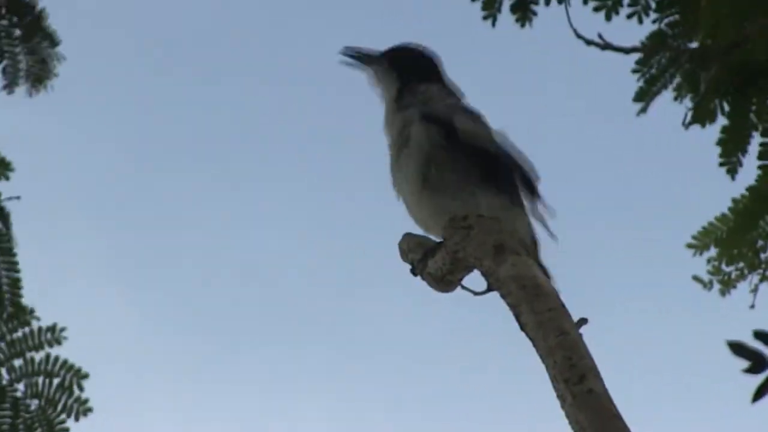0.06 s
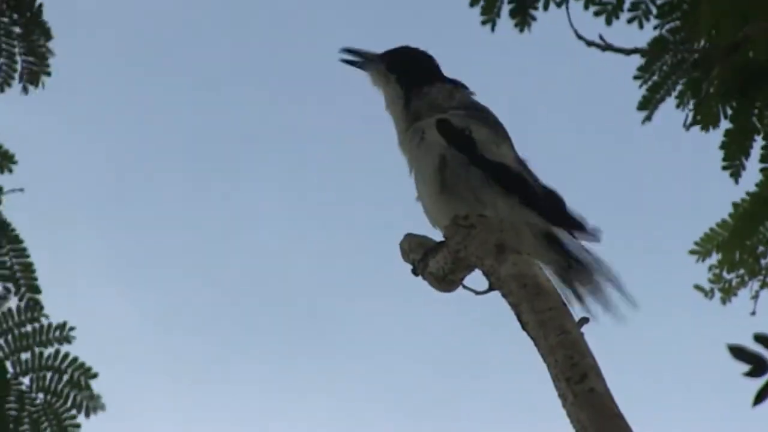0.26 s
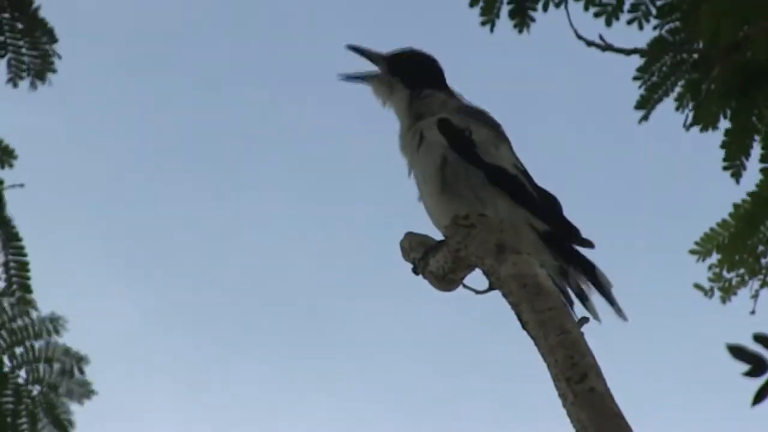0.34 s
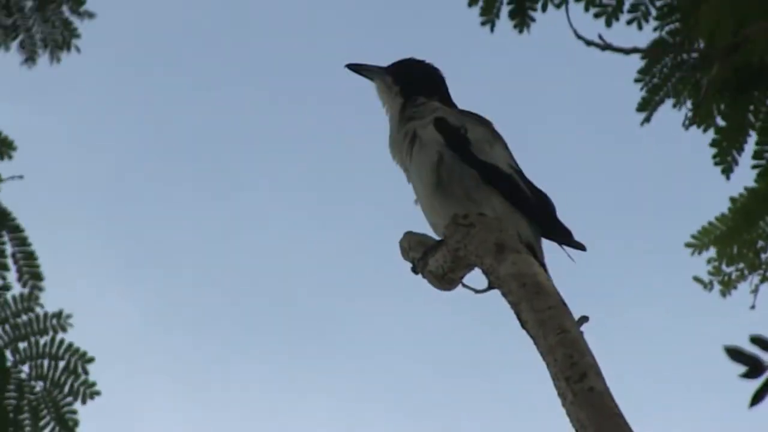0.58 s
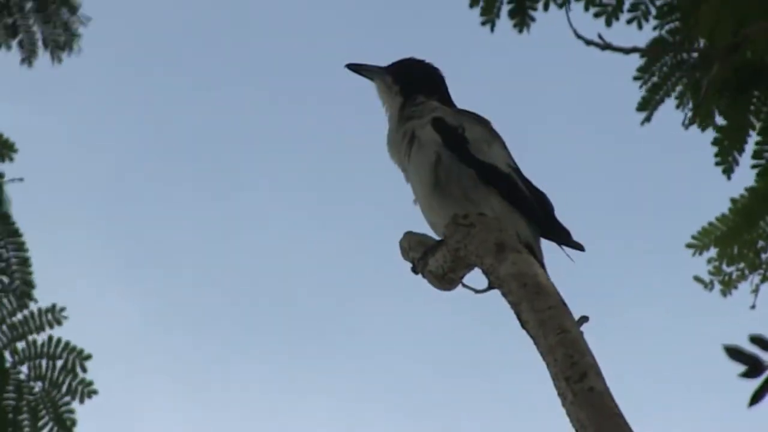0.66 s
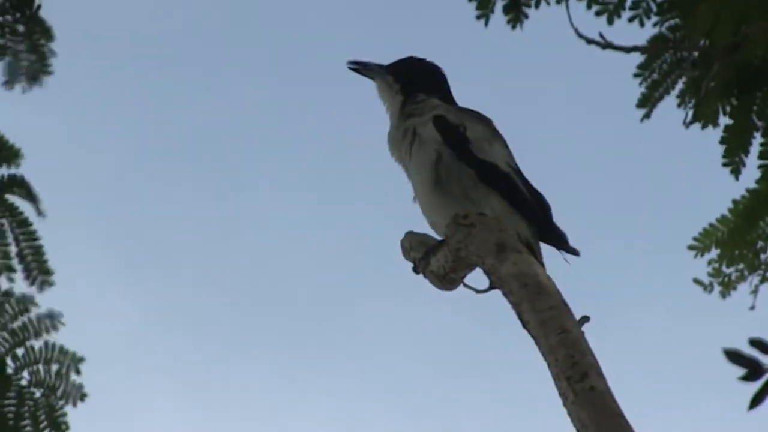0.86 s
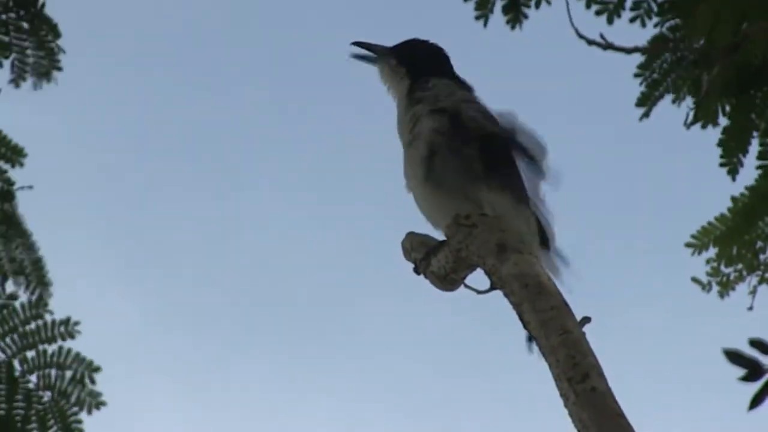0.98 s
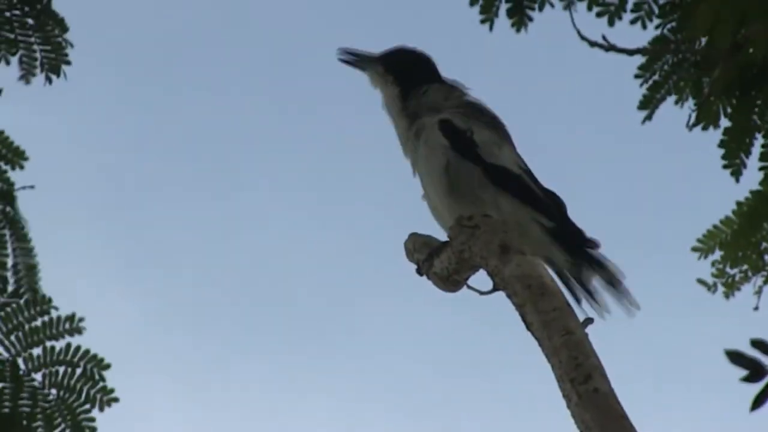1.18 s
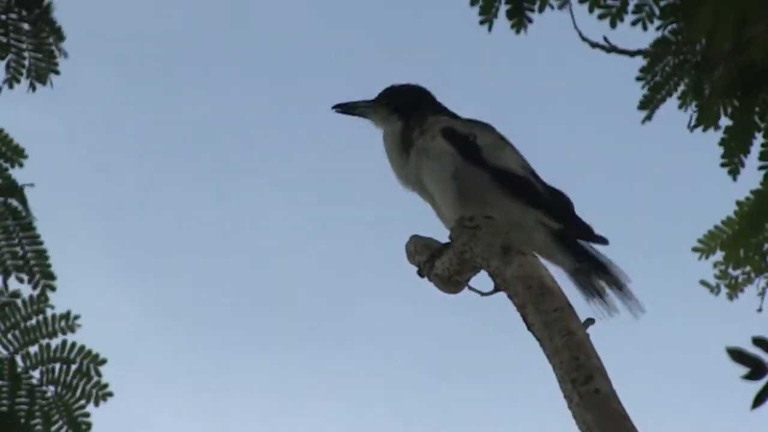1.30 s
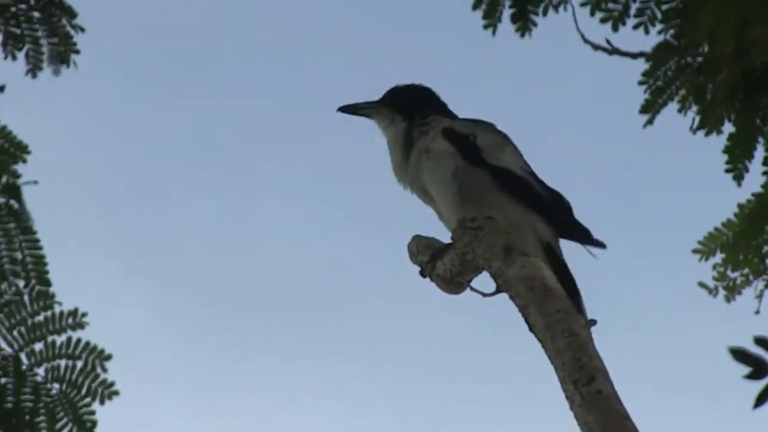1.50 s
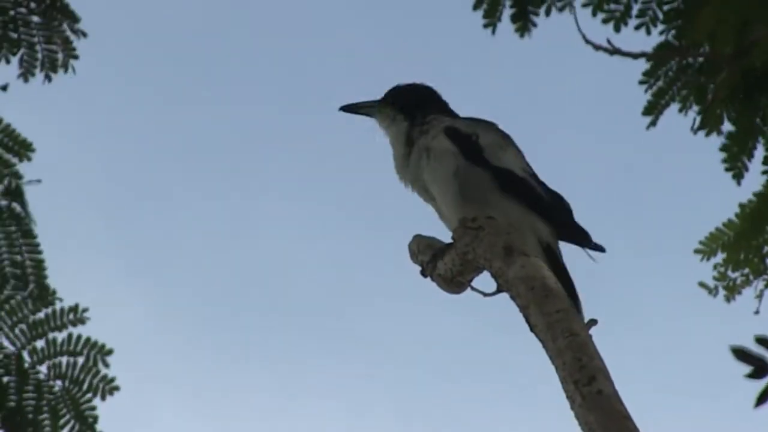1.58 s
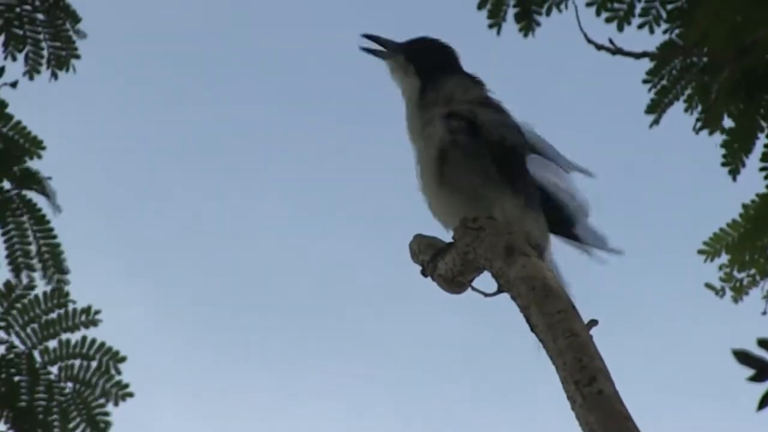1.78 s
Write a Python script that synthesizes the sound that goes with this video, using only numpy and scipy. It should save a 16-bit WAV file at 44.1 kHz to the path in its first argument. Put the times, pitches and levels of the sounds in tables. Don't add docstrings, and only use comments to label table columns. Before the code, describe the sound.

Separate butcherbird calls, tonal then raspy, throbbing, fluty and finally a short cluck, heard from a few metres away in open air with light leafy echo, faint far coos, steady traffic hum and a fading engine.

```python
import sys
import numpy as np
from scipy import signal
from scipy.fft import rfft, irfft
from scipy.io import wavfile
from scipy.ndimage import uniform_filter1d

SR = 44100
rng = np.random.default_rng(int(sys.argv[2]) if len(sys.argv) > 2 else 0)


def linear_from_db(decibels):
    return 10 ** (np.asarray(decibels, float) / 20)


def to_wav(s):
    ch = np.atleast_2d(s).T
    pcm = np.round(np.clip(ch, -1, 1) * 32767)
    wavfile.write(sys.argv[1], SR, pcm.astype(np.int16))


N = 81585
T = np.arange(N) / SR

# time_s, pitch_hz, fundamental_db, overtones_db
CHIP_NOTE = [(.192, 1010, -49, -71), (.198, 1004, -32.5, -54.5), (.203, 1082, -30.5, -61),
             (.211, 1010, -34.5, -68.5), (.218, 1050, -40, -75)]
RISING_NOTE = [(0.271, 795, -37, -72), (.286, 898, -35.5, -72), (.306, 929.5, -25.5, -75),
               (.317, 951, -26, -50), (0.33, 990, -43, -49), (.346, 1010, -24.5, -48),
               (0.36, 1072, -18, -46), (0.369, 1160, -30, -46)]
RISE_CREST = [(.373, 1158, -21, -40), (.376, 1185, -15.5, -48), (.378, 1245, -16.5, -52),
              (.38, 1300, -23, -54), (.382, 1285, -17, -54), (.384, 1250, -15, -56), (.387, 1250, -30, -60),
              (.39, 1260, -24, -62), (.393, 1240, -26, -64), (.397, 1050, -36, -70), (.401, 1000, -55, -75)]
GRACE_NOTE = [(1.112, 1187, -49.5, -58), (1.117, 1214, -28.5, -53), (1.121, 1150, -41.5, -58.5),
              (1.126, 1120, -30, -72), (1.131, 1170, -46.5, -78)]
HELD_NOTE = [(1.132, 1210, -39, -62), (1.142, 1121, -22.5, -43.5), (1.147, 1083, -32.5, -48.5),
             (1.152, 1084, -22, -47.5), (1.173, 1071, -22, -48.5), (1.181, 1088, -29, -43),
             (1.195, 1082, -23, -46.5), (1.215, 1101, -26.5, -48.5), (1.227, 1117, -37, -45)]
FALLING_NOTE = [(1.238, 1154, -20.5, -40), (1.244, 1129, -16.5, -47.5), (1.252, 1135, -30.5, -43.5),
                (1.262, 1009, -19.5, -54.5), (1.269, 1009, -39.5, -54), (1.278, 962, -32, -71),
                (1.285, 950, -37, -74), (1.299, 950, -70, -77.5)]
CLUCK_NOTE = [(1.549, 1056, -37, -72), (1.56, 1063, -31.5, -55.5), (1.568, 954, -41.5, -71),
              (1.57, 1010, -24.5, -64), (1.579, 1035, -28.5, -69), (1.584, 1046, -57, -54.5),
              (1.589, 1016, -27, -69), (1.603, 995, -49, -70)]
# centre_hz, width_hz, level_db
FLUTY_THROAT = [(2200, 500, -12.5), (3120, 500, -21.5), (4660, 430, 3.5), (6060, 1600, -15),
                (9000, 1100, -16), (9500, 320, -13), (12100, 890, -27.5), (14100, 900, -28)]
RISING_THROAT = [(1980, 640, -12), (2930, 370, -6), (4690, 480, 3), (6070, 1500, -16), (8860, 970, -7),
                 (11500, 1500, -22), (13000, 1200, -21), (14300, 900, -25)]
SHORT_NOTE_THROAT = [(4950, 900, 1.5), (7300, 490, -9), (10200, 1500, -23), (12800, 1500, -22)]
# frequency_hz, level_db
CLEAR_BREATH = [(800, -19), (2500, -17.5), (5000, 16), (8000, -7), (12500, -8), (15500, -28)]
CLEAR_ROUGH = 0.0027
BREATHY_DB, SHORT_BREATHY_DB = -18, -5
CLUCK_THROAT = 1.056

# time_s, second_partial_hz, level_db, roughness_0_to_1
RASP_ARCHES = [
    [(.408, 2300, -44, .4), (.41, 2415, -30, .35), (.412, 2440, -33, .3), (.414, 2540, -25, .15),
     (.416, 2530, -28, .15), (.42, 2335, -22, .05), (.423, 2320, -29, .4), (.427, 2290, -34, .6),
     (.432, 2600, -36, .7), (.436, 2560, -32, .6)],
    [(.435, 2400, -38, .3), (.4375, 2390, -25, .15), (.441, 2490, -22.5, .05), (.446, 2450, -24, .03),
     (.45, 2380, -24, .03), (.453, 2260, -35, .5), (.458, 2400, -37, .6)],
    [(.457, 2450, -38, .4), (.46, 2440, -34, .3), (.463, 2265, -28, .2), (.467, 2190, -35, .3),
     (.472, 2100, -38, .4), (.478, 2150, -42, .5), (.484, 2300, -47, .4)],
]
# frequency_hz, level_db
RASP_RESONANCE = [(1200, -12), (2400, 1), (3700, -34), (4900, -24), (6200, -15), (8700, -26), (11000, -40),
                  (15000, -56)]
# frequency_hz, level_db
RASP_HISS = [(800, -16), (2500, 7), (4000, -6.5), (6000, -2), (8000, -25), (12000, -15.5), (13500, -37),
             (15500, -48.5)]
RASP_ROUGH, RASP_HISS_DB = 0.0493, -6

# start_s, length_s, start_hz, end_hz, level_db
SIDE_WHISTLES = [
    (.389, .011, 1860, 1672, -29),
    (.399, 0.0044, 2200, 1800, -34.5),
    (.46, .032, 2078, 1475, -37.5),
    (.487, .009, 2500, 2343, -37),
    (1.265, .016, 12700, 12650, -62.5),
]
# start_s, length_s, start_hz, end_hz, level_db
BREAK_OVERTONES = [
    (.382, .008, 4850, 4400, -40),
    (.39, .006, 4520, 4400, -43),
    (.377, .007, 6400, 6450, -50),
    (.382, .006, 7400, 6700, -47),
    (.391, .007, 7150, 7100, -47),
    (.4, .004, 7300, 7200, -49),
]
WHISTLE_ROUGH, BREAK_ROUGH = .03, .03

# time_s, pitch_hz, level_db, throb_depth_0_to_1
CHURR_NOTE = [(.668, 984.4, -41, 0.45), (.69, 963, -37.5, 0.65), (.713, 956, -33.5, 0.67),
              (.736, 950, -29.5, 0.5), (.752, 941, -32.5, 0.37), (.764, 972.6, -28, 0.67),
              (.774, 995, -32.5, .2), (.786, 962, -27.5, 0), (.797, 965, -39, 0.3), (.808, 950, -56, .3)]
THROB_CRESTS = [.664, .674, .683, .692, .7, .713, .724, .736, .751, .764, .773, .782, .796, .808]
# time_s, pitch_hz, level_db, breath_db
CHURR_HIGH_RING = [(.69, 5300, -76, -82), (.706, 5250, -61, -75), (.742, 5130, -59, -68),
                   (.765, 5150, -63, -69), (.776, 4950, -59.5, -66), (.8, 4950, -85, -75.5)]
# frequency_hz, level_db
CHURR_BREATH_COLOUR = [(4000, -18), (7000, -7), (8800, -5), (10500, -12), (12500, -0.5), (14000, -20)]
CHURR_SWEEP, CHURR_TURNS = 0.14, .12

# time_s, pitch_hz, level_db
MATE_COOS = [
    [(0, 770, -31.5), (.012, 735, -50), (.026, 707, -35), (.048, 647, -68)],
    [(.802, 690, -36), (.83, 727, -32.5), (.862, 700, -36.5), (.895, 660, -39)],
    [(1.33, 600, -41), (1.375, 613, -32.5), (1.394, 818, -44.5), (1.428, 578, -41)],
    [(1.583, 876, -47), (1.6, 704, -35.5), (1.645, 733, -36.5), (1.685, 697, -35.5), (1.705, 670, -68)],
]

TAIL_T60_S, TAIL_DB, COO_TAIL_DB = 0.5, -16, -17
BIRD_PAN_DB, BIRD_LEAD_S = 1.6, -.000004

# frequency_hz, level_db
TRAFFIC = [(25, -13), (152, 1.5), (322, -8.5), (640, -10.5), (1200, -14), (2490, -28.5), (8000, -53.5),
           (15500, -75.5)]
# frequency_hz, level_db
TRAFFIC_SPREAD = [(100, -22), (700, -20), (2400, 4), (8000, 8.5), (13000, 12.5)]
# time_s, pitch_hz, level_db
ENGINE_DRONE = [(0, 70.2, -42), (.3, 68.77, -40.5), (1.05, 63.4, -44.5), (1.3, 60.3, -48), (1.85, 52, -65)]
ENGINE_ORDERS = [-1, -10.5, -23.5]
TOWN_DB, TOWN_LAG_S, LOW_CUT_HZ = -38.5, .0001, 37


def unit(x):
    return x / np.sqrt(np.mean(x ** 2))


def colour(table, hz):
    f, db = np.array(table, float).T
    return np.interp(np.log(np.maximum(hz, 1)), np.log(f), db)


def shaped(table):
    spectrum = rfft(rng.standard_normal(N))
    return unit(irfft(spectrum * linear_from_db(colour(table, np.fft.rfftfreq(N, 1 / SR))), N))


def walk(rate):
    k = int(SR / rate)
    return unit(uniform_filter1d(uniform_filter1d(rng.standard_normal(N), k), k))


def tracks(table, fade_s=0.00098):
    rows = np.array(table, float).T
    time = rows[0]
    cols = [np.interp(T, time, c) for c in rows[1:]]
    gate = np.clip(np.minimum(T - time[0], time[-1] - T) / fade_s, 0, 1)
    cols[0] = uniform_filter1d(cols[0], size=90)
    cols[1] = np.sqrt(2) * np.interp(T, time, linear_from_db(rows[2] / 2)) ** 2 * gate
    return cols


def turn(hz):
    return 2 * np.pi * np.cumsum(hz) / SR


def throat(hz, shape):
    return np.sqrt(sum(linear_from_db(db) ** 2 / (1 + (2 * (hz - f) / w) ** 4) for f, w, db in shape))


def clear_note(table, wobble, air, shape, beak, breathy_db):
    hz, gain, over_db = tracks(table)
    phase = turn(hz * (1 + CLEAR_ROUGH * wobble))
    on = uniform_filter1d(gain, size=90) > 0
    f = hz[on]
    overtones = np.zeros(N)
    for k in range(2, 16):
        audible = k * f < 15500
        overtones[on] += throat(k * f / beak, shape) * audible * np.sin(k * phase[on])
    sounding = uniform_filter1d(1. * (gain > 0), size=90)
    filtered = overtones + linear_from_db(breathy_db) * air
    return gain * np.sin(phase) + sounding * np.sqrt(2) * linear_from_db(over_db) * filtered


def clear_song():
    wobble, air = walk(310), shaped(CLEAR_BREATH)
    notes = [(RISING_NOTE + RISE_CREST, RISING_THROAT, 1, BREATHY_DB),
             (HELD_NOTE + FALLING_NOTE, FLUTY_THROAT, 1, BREATHY_DB),
             (GRACE_NOTE, SHORT_NOTE_THROAT, 1, SHORT_BREATHY_DB),
             (CHIP_NOTE, SHORT_NOTE_THROAT, CLUCK_THROAT, SHORT_BREATHY_DB),
             (CLUCK_NOTE, SHORT_NOTE_THROAT, CLUCK_THROAT, SHORT_BREATHY_DB)]
    return sum(clear_note(note, wobble, air, *voicing) for note, *voicing in notes)


def rasp(table):
    hz, gain, rough = tracks(table)
    rough = np.clip(rough, 0, 1)
    fundamental = hz / 2
    phase = turn(fundamental * (1 + RASP_ROUGH * rough * walk(700)))
    voice = sum(linear_from_db(colour(RASP_RESONANCE, k * fundamental)) * np.sin(k * phase) for k in range(1, 13))
    gating = 1 + 0.55 * np.cos(phase)
    hiss = linear_from_db(RASP_HISS_DB) * np.sqrt(rough) * shaped(RASP_HISS) * gating
    effort = uniform_filter1d(gain, size=280)
    shimmer = linear_from_db(4.4 * rough * walk(380))
    return gain * shimmer * voice + effort * hiss


def whistles(table, rough):
    out, jitter, flutter = 0, rough * walk(500), linear_from_db(2.9 * walk(200))
    for start, length, hz0, hz1, db in table:
        u = np.clip((T - start) / length, 0, 1)
        looseness = (hz0 < 10000) * (1 - .6 * (length < .012) * (hz0 < 1900))
        glide = (hz0 + (hz1 - hz0) * u) * (1 + jitter * looseness)
        envelope = np.sqrt(2 * np.sin(np.pi * u).clip(0))
        out = out + linear_from_db(db) * envelope * np.sin(turn(glide))
    return out * flutter


def churr():
    hz, gain, depth = tracks(CHURR_NOTE)
    cycles = np.interp(T, THROB_CRESTS, np.arange(len(THROB_CRESTS)))
    throb = 2 * np.pi * uniform_filter1d(cycles, size=120)
    pulse = 1 + np.clip(depth, 0, 1) * np.cos(throb)
    droop = CHURR_SWEEP * depth * np.cos(throb + 2 * np.pi * CHURR_TURNS)
    tone = np.sin(turn(hz * (1 + droop + 0.0092 * walk(220))))
    ring_hz, ring_gain, breath_db = tracks(CHURR_HIGH_RING)
    breath = (ring_gain > 0) * linear_from_db(breath_db + 1.6 * walk(60)) * shaped(CHURR_BREATH_COLOUR)
    ring = ring_gain * np.sin(turn(ring_hz * (1 + 0.009 * walk(190)))) * linear_from_db(2.6 * walk(170))
    return gain * pulse * tone * linear_from_db(0.75 * walk(90)) + ring + breath


def butcherbird():
    bird = clear_song() + sum(map(rasp, RASP_ARCHES)) + churr()
    return bird + whistles(SIDE_WHISTLES, WHISTLE_ROUGH) + whistles(BREAK_OVERTONES, BREAK_ROUGH)


def placed(bird):
    side = np.array([[1], [-1]])
    lead = np.exp(1j * np.pi * np.fft.rfftfreq(N, 1 / SR) * BIRD_LEAD_S * side)
    return irfft(rfft(bird) * lead, N) * linear_from_db(side * BIRD_PAN_DB / 2)


def mate():
    coos = sum(gain * np.sin(turn(hz)) for hz, gain in map(tracks, MATE_COOS))
    return linear_from_db(0.17 * walk(60)) * coos


def trees(x, tail_db):
    t = T[:SR // 2]
    decay = linear_from_db(-60 * t / TAIL_T60_S) * np.clip(t / 0.0038, 0, 1)
    ir = rng.standard_normal((2, len(t))) * decay
    ir = 0.83 * ir + 0.59 * ir[::-1] * 0.5
    ir *= linear_from_db(tail_db) / np.sqrt(np.sum(ir ** 2, axis=1, keepdims=True))
    return signal.fftconvolve(x[None], ir, axes=1)[:, :N]


def traffic():
    f = np.fft.rfftfreq(N, 1 / SR)
    low_cut = f ** 4 / (f ** 4 + LOW_CUT_HZ ** 4)
    mid, *own = rfft(rng.standard_normal((3, N))) * linear_from_db(colour(TRAFFIC, f)) * low_cut
    own = np.array(own) * linear_from_db(colour(TRAFFIC_SPREAD, f))
    late = np.exp(-1j * np.pi * f * TOWN_LAG_S)
    pair = np.array([mid * late, mid / late]) + own
    out = 0
    for hz in 30 * 2. ** np.arange(10):
        octaves = np.log2(np.maximum(f, 1) / hz)
        band = np.cos(np.pi / 2 * np.clip(octaves, -1, 1)) ** 2
        out = out + irfft(pair * band, N) * linear_from_db(1.33 * walk(7.2))
    return out * linear_from_db(TOWN_DB) / np.sqrt(np.mean(out[0] ** 2))


def engine():
    hz, gain = tracks(ENGINE_DRONE)
    phase = turn(hz * (1 + 0.0277 * walk(8.0)))
    orders = enumerate(ENGINE_ORDERS, 1)
    return gain * sum(linear_from_db(db + 0.49 * walk(2.6)) * np.sin(k * phase) for k, db in orders)


def scene():
    bird, coos = butcherbird(), mate()
    near = placed(bird) + trees(bird, TAIL_DB)
    far = coos + trees(coos, COO_TAIL_DB)
    return near + far + traffic() + engine()


def top_cut(x):
    return signal.sosfilt(signal.butter(12, 15630, fs=SR, output="sos"), x)


def record(dry):
    return top_cut(dry)


dry = scene()
out = record(dry)
to_wav(out)
```